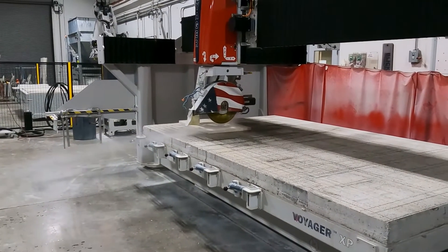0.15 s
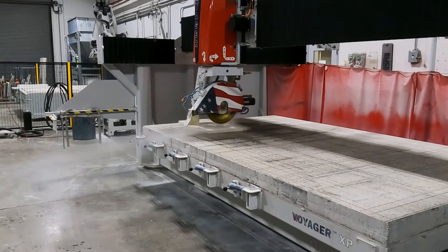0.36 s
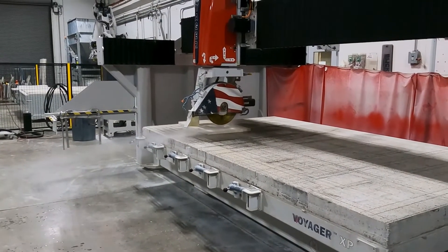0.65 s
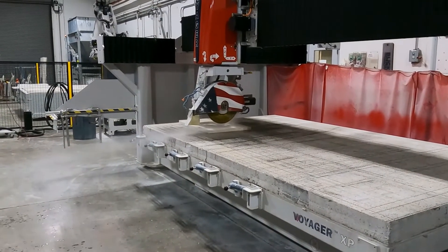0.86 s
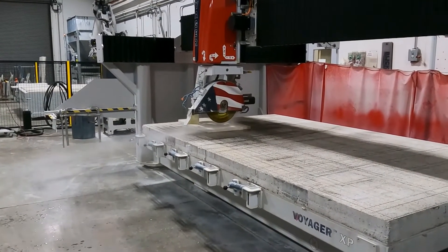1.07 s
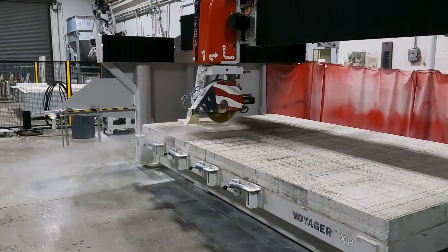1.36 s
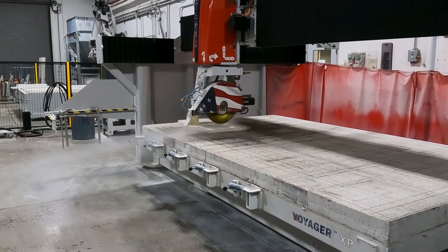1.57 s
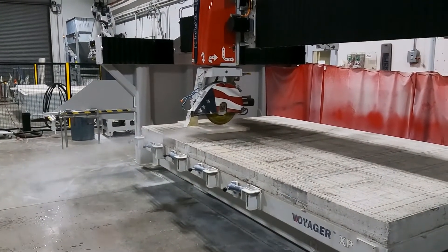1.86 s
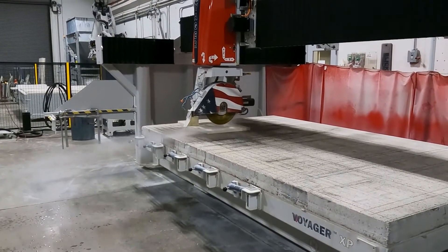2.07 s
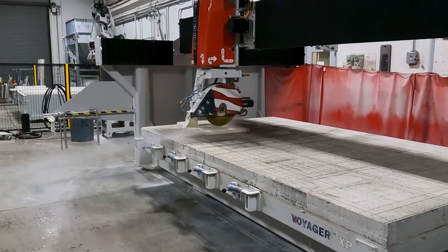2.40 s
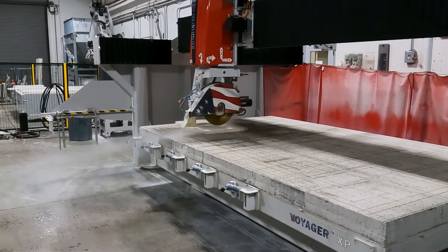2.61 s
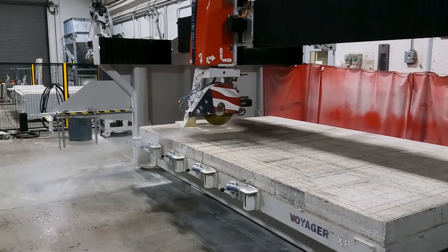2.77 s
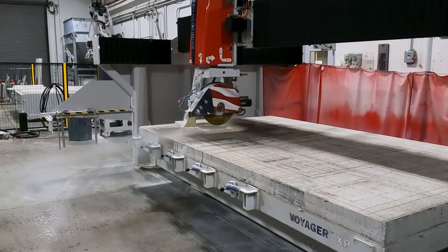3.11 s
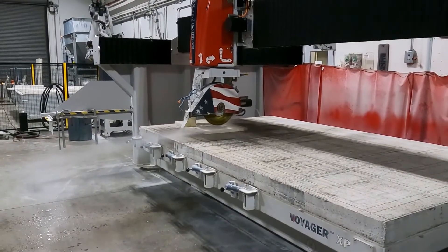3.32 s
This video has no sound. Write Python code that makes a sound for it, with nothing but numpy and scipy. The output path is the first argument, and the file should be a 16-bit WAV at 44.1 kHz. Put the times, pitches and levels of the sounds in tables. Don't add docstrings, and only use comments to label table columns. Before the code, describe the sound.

A large bridge saw whines at a steady high pitch while cooling water hisses off its blade; a deep fan throb and low machine rumble sit underneath, in a big reverberant workshop, heard through a hand-held camera microphone.

```python
import sys
import numpy as np
from scipy import signal
from scipy.io import wavfile
from scipy.ndimage import uniform_filter1d

SR = 44100
rng = np.random.default_rng(int(sys.argv[2]) if len(sys.argv) > 2 else 0)


def volts(x):
    e = np.asarray(x, float) / 20
    return 10 ** e


def unload_audio(sound):
    columns = np.transpose(np.atleast_2d(sound))
    steps = np.round(np.clip(columns, -1, 1) * 32767)
    wavfile.write(sys.argv[1], SR, steps.astype(np.int16))


N = 152145
TIME = np.arange(N) / SR
HOP = 147
SLOW_TIME = np.arange(N // HOP + 1) * HOP / SR


def unit(x):
    return x / np.sqrt(np.mean(x ** 2) + 1e-20)


def along(points, hz):
    f, v = np.transpose(points)
    return np.interp(np.log(hz + 1), np.log(f + 1), v)


def curves(rows):
    s, *cols = np.transpose(rows)
    return [np.interp(TIME, s, c) for c in cols]


def wobble(rate, count=1):
    at = SLOW_TIME * rate
    knots = rng.standard_normal((count, 64))
    return np.array([np.interp(at, np.arange(64), k) for k in knots])


def stretch(v):
    return np.repeat(v, HOP, axis=-1)[..., :N]


def sides(db, pan_db):
    return np.sqrt(2) * volts([db + pan_db / 2, db - pan_db / 2])


def tone(hz, gains, lead, start=None):
    chance = rng.random()
    turn = 2 * np.pi * (hz * TIME + (chance if start is None else start))
    return np.array([gains[0] * np.cos(turn + lead / 2), gains[1] * np.cos(turn - lead / 2)])


# (frequency [Hz], correlation [0-1])
LIKENESS = [(200, 1), (300, 0.95), (900, 0.75), (2700, 0.55), (5000, 0.64), (9500, 0.91), (11000, 0.93),
            (12100, 0.58)]
# (frequency [Hz], lead [rad])
LEFT_LEAD = [(0, 0.39), (3360, -0.22), (3620, -1.1), (4400, -0.75), (4910, 0.34), (8530, -0.48),
             (12900, 0.31)]
# (frequency [Hz], left over right [dB])
BALANCE = [(300, 0), (850, -0.5), (2500, 0), (4700, -2.5), (6500, -2), (9000, 0.5)]


def rush(spectrum, patchy_db, bins, frames):
    hz, t, z = signal.stft(rng.standard_normal((2, N)), SR, nperseg=2048)
    field = uniform_filter1d(rng.standard_normal(z.shape[1:]), bins, 0)
    patches = unit(uniform_filter1d(field, frames, 1))
    closed = [(spectrum[0][0] * .8, -90)] + spectrum + [(spectrum[-1][0] * 1.03, -90)]
    mid, side = z * volts(patchy_db * patches + along(closed, hz)[:, None])
    width = np.arccos(np.clip(along(LIKENESS, hz), -1, 1))[:, None] / 2
    lead = (np.exp(.5j * along(LEFT_LEAD, hz)) * volts(along(BALANCE, hz) / 2))[:, None]
    mid, side = mid * np.cos(width), side * np.sin(width)
    both = np.array([(mid + side) * lead, (mid - side) / lead])
    return unit(signal.istft(both, SR, nperseg=2048)[1][:, :N])


SWITCH_HZ, DRIVE_HZ = 3999.85, 41.71
# (time [s], lower level [dB], upper level [dB], lower pan [dB], upper pan [dB])
PAIR_DRIFT = [(0.0, -34, -27, 11.5, -2.0), (0.02, -34, -28, 7.5, -1.5), (0.21, -32, -29, 3.5, 0.5),
              (0.64, -31, -30, 1.5, -3.5), (1.0, -30, -29, -2.5, -5.0), (1.45, -29, -25, -2.0, -2.5),
              (1.77, -28, -25, -2.5, -2.5), (2.36, -28, -28, 0.5, -4.0), (2.64, -31, -30, 0.5, -4.5),
              (2.81, -33, -33, -3.5, -5.0), (3.01, -35, -30, -6.0, -1.5), (3.05, -34, -30, -0.5, -1.0),
              (3.1, -35, -31, -4.5, -3.0), (3.13, -38, -30, -0.5, -2.5), (3.2, -33, -31, -2.5, -1.5),
              (3.32, -38, -34, -2.5, -6.0), (3.4, -34, -32, 0.0, -3.0), (3.45, -38, -38, 1.0, -2.0)]


def strong_pair():
    low_db, high_db, low_pan, high_pan = curves(PAIR_DRIFT)
    boost_db, runout, skirt_db = 5.5, .09, -22
    low_lead, high_lead = -0.93 + 0.083 * stretch(wobble(2.34, count=2))
    pair = tone(SWITCH_HZ - 3 * DRIVE_HZ, sides(low_db + boost_db, low_pan), low_lead, 0)
    pair = pair + tone(SWITCH_HZ + 3 * DRIVE_HZ, sides(high_db + boost_db, high_pan), high_lead, 0)
    blade = np.pi * DRIVE_HZ * TIME
    swing = runout * np.cos(blade) + 0.0065 * np.cos(2 * blade + 1)
    grit = unit(uniform_filter1d(rng.standard_normal((2, N)), size=400))
    return pair * (1 + swing + volts(skirt_db) * grit)


def weak_sideband(hz, db, start=None):
    wander_db, wander_rad = 3, 1
    swell, pan, shift = wobble(9, count=3)
    gains = stretch(sides(db + wander_db * swell, wander_db * pan))
    lead = stretch(along(LEFT_LEAD, hz) + wander_rad * shift)
    return tone(hz, gains, lead, start)


NEAR_SIDEBANDS = [-21, -13, -9, -4, -1, -.5, 0, .5, 1, 1.5, 9, 13, 15, 19]
NEAR_LEVELS = [-46, -47, -36, -48, -44, -49, -49, -52, -45, -51, -37, -44, -56, -52]
OCTAVE_SIDEBANDS = [-47, -29, -26, -22, -20, -18, -16, -12, -10, -8, -6, -4, -2, 0, 2, 4, 6, 8, 10, 16]
OCTAVE_LEVELS = [-52, -53, -52, -49, -53, -47, -46, -56, -53, -54, -53, -53, -55, -58, -57, -56, -49, -58,
                 -54, -52]
LOCKED_PHASES = {-9: .5, 9: 0}


def whine():
    out = strong_pair()
    for order, db in zip(NEAR_SIDEBANDS, NEAR_LEVELS):
        if order == -9:
            db = db - 1.5 * SLOW_TIME
        out = out + weak_sideband(SWITCH_HZ + order * DRIVE_HZ, db, LOCKED_PHASES.get(order))
    for order, db in zip(OCTAVE_SIDEBANDS, OCTAVE_LEVELS):
        out = out + weak_sideband(2 * SWITCH_HZ + order * DRIVE_HZ, db)
    return out


# (frequency [Hz], density [dB per Hz])
SPRAY_SPECTRUM = [(2950, -27), (3050, -1.5), (3780, 0), (3900, 1.5), (4700, 0), (5400, -4), (7300, -3.5),
                  (8100, -10.5)]
# (frequency [Hz], density [dB per Hz])
MIST_SPECTRUM = [(7000, -43), (8100, 0.5), (10000, 0), (12130, -4.5), (12200, -11), (13500, -17.5),
                 (15500, -25)]


def water():
    spray_gain = stretch(volts(-26.5 + 0.72 * wobble(5.05)))
    mist_gain = stretch(volts(-35 + 0.43 * wobble(6.25)))
    spray = spray_gain * rush(SPRAY_SPECTRUM, patchy_db=0.92, bins=16, frames=3)
    return spray + mist_gain * rush(MIST_SPECTRUM, patchy_db=0.66, bins=24, frames=3)


# (time [s], level [dB])
FAN_LEVELS = [(0.0, -21), (0.06, -14.5), (0.4, -12), (0.46, -19), (0.59, -12.5), (1.58, -13), (1.63, -20.5),
              (1.82, -13), (1.94, -20), (2.07, -10), (2.23, -18.5), (2.3, -12.5), (2.63, -13), (2.8, -20.5),
              (2.85, -13), (3.11, -17.5), (3.21, -15.5), (3.45, -14.5)]
# (time [s], level change [dB])
FAN_SAGS = [
    (.23, -4),
    (.8, -4),
    (.94, -2),
    (1.03, -4),
    (1.4, -1.5),
    (2.51, -2.5),
    (.57, -2.5),
    (.7, -2.5),
    (3.38, -4.5),
]


def fan():
    throb_hz, sag_s, pan_db, lead_rad = 29.62, 0.02, .7, .11
    db, = curves(FAN_LEVELS)
    for s, change_db in FAN_SAGS:
        db = db + change_db * np.exp(-.5 * ((TIME - s) / sag_s) ** 2)
    unsteady_db = 0.44 * np.interp(TIME, SLOW_TIME, wobble(9.4)[0])
    return tone(throb_hz, sides(db + 0.83 + unsteady_db, pan_db), lead_rad)


# (frequency [Hz], density [dB per Hz])
RUMBLE_SPECTRUM = [(40, 10.5), (70, -3), (250, -8.5), (700, -13), (850, -8), (1750, -10.5), (2000, -4),
                   (3000, -6)]


def rumble():
    return volts(-31) * rush(RUMBLE_SPECTRUM, patchy_db=3.0, bins=3, frames=2)


def scene():
    return whine() + water() + fan() + rumble()


BAND_EDGES = [95, 150, 235, 470, 730, 960, 1200, 1900, 2300, 3000, 3820]
BAND_SETTLE = [-0.5, 3, 1, -3.5, -1.5, -1.5, -4, -8.5, -14.5, -13.5, -6.5, 0]
BAND_FLUTTER = [3, 3.5, 3.5, 3, 3, 1.2, 2, 1.3, 1.3, 2, .8, 0]
# (time [s], frequency [Hz], change [dB],
# length [s])
BAND_CHANGES = [(0.11, 870, 11, 0.12), (0.21, 200, 4.5, 0.05), (0.277, 280, 3, 0.062), (0.34, 110, 6, 0.15),
                (0.39, 850, 7, 0.31), (0.5, 550, 8, 0.088), (0.86, 130, 9.5, 0.19), (1.01, 260, -2.5, .08),
                (1.19, 80, 10, 0.063), (1.176, 130, 10, 0.11), (1.208, 260, 7.5, 0.065),
                (1.478, 550, 11, 0.044), (1.7, 180, 5.5, 0.066), (1.655, 180, -10, 0.065),
                (1.67, 300, -6, 0.054), (1.753, 110, 9.5, 0.075), (1.95, 300, 6.5, 0.13),
                (3.4, 320, 4.5, 0.092), (2.4, 220, 5.5, 0.053), (2.397, 180, -22, 0.099), (2.34, 400, 5, 0.32),
                (2.57, 600, 2, 0.32), (2.68, 70, 8.5, 0.13), (2.73, 2700, -8, 0.1), (2.857, 165, 7, 0.053),
                (3.4, 200, 2, 0.054), (3.255, 110, 12.5, 0.064), (3.234, 800, 9, 0.073),
                (3.51, 1100, 5.5, 0.26), (3.7, 110, 9.5, 0.087), (0.053, 700, 5.5, 0.11),
                (0.63, 600, 5.5, 0.053), (0.93, 600, 6.5, .08), (3.2, 600, 4.5, 0.089),
                (0.021, 850, 5.5, 0.034), (0.856, 850, 5, .08), (1.566, 1100, 4, 0.13), (1.96, 1100, 3, .08),
                (2.41, 1100, 5, 0.14), (1.82, 1500, 2.5, .3), (2.33, 1500, 10, 0.073), (0.37, 2100, 1.5, 0.53),
                (1.84, 2100, 3, 0.41), (1.91, 2600, 4.5, 0.11), (0.52, 2600, 1.5, 0.22), (0.58, 300, 5, 0.079),
                (2.15, 350, 4.5, 0.068), (1.58, 190, 5, 0.17), (2.55, 190, 7.5, 0.16), (3.02, 350, 5.5, 0.078),
                (0.082, 70, 1, 0.13), (0.29, 120, -5, 0.074), (.05, 1100, -4, .08), (0.31, 1500, -2, 0.16),
            (0.68, 850, -4, 0.17), (0.92, 1100, -8, 0.092), (1.37, 350, -4, 0.16), (1.68, 70, -5, 0.13),
            (1.85, 1100, -3, 0.066), (1.935, 850, -9, 0.058), (2.55, 600, -6.5, 0.068),
            (2.74, 1500, -7, 0.087), (3.14, 2600, -2, .18), (3.37, 70, 4, 0.1), (2.5, 2600, -2.5, .15),
            (0.255, 2100, -3, 0.068), (.25, 600, -4, 0.061), (2.5, 170, -8, .08)]


def suppressor(hz, t):
    settle_s, knee, flutter_rate = 1, 1.74, 14
    slow_index = np.minimum(np.arange(len(t)) * 7, N // HOP)
    flutter = wobble(flutter_rate, count=12)[:, slow_index]
    clamp = 1 - np.exp(-(t / settle_s) ** knee)
    bands = np.outer(BAND_SETTLE, clamp) + np.array(BAND_FLUTTER)[:, None] * flutter
    for s, at_hz, db, length in BAND_CHANGES:
        bump = np.exp(-.5 * ((t - s) / (length / 2.27)) ** 2)
        bands[np.searchsorted(BAND_EDGES, at_hz)] += 1.33 * db * bump
    return volts(bands[np.searchsorted(BAND_EDGES, hz)] * (hz > 45)[:, None])


SURE_HZ = 12170
# (time [s], top frequency [Hz])
TREBLE_SPURTS = [(.1, 14400), (.16, 13800), (.24, 15000), (.31, 14900), (.38, 14200), (.55, 15100),
                 (.62, 14600), (.74, 14500), (.83, 15000), (.9, 15000), (.97, 15200), (1.04, 14900),
                 (1.1, 14000), (1.19, 14500), (1.29, 13800), (1.41, 14200), (1.48, 14100), (1.57, 14900),
                 (1.82, 13900), (1.92, 13800), (1.97, 13800), (2.1, 14400), (2.15, 14300), (2.22, 14000),
                 (2.29, 15600), (2.4, 14400), (2.5, 14700), (2.59, 14300), (2.66, 13600), (2.91, 13400),
                 (3.1, 14500), (3.19, 13600), (3.31, 15200)]


def treble_gate(hz, t):
    spread_hz, empty_share, half_s = 400, .25, .024
    spare = unit(uniform_filter1d(rng.standard_normal(len(t)), size=2))
    top_hz = SURE_HZ + spread_hz * (.5 + spare)
    for s, reach_hz in TREBLE_SPURTS:
        top_hz[abs(t - 524 / SR - s) < half_s] = reach_hz
    slices = rng.random((129, len(t))) > empty_share
    slices = np.repeat(slices, 8, axis=0)[:len(hz)]
    return (hz[:, None] < SURE_HZ) | slices & (hz[:, None] < top_hz)


def top_cut(x):
    return signal.sosfilt(signal.butter(12, 15620, fs=SR, output="sos"), x)


def record(dry):
    late = np.pad(dry, ((0, 0), (524, 0)))
    hz, t, z = signal.stft(late, SR, nperseg=2048)
    gain = suppressor(hz, t) * treble_gate(hz, t)
    mid = z.mean(0)
    z = np.where(hz[:, None] < SURE_HZ, z, mid + 0.89 * (z - mid))
    kept = signal.istft(z * gain, SR, nperseg=2048)[1][:, 524:][:, :N]
    return top_cut(kept)


dry = scene()
out = record(dry)
unload_audio(out)
```